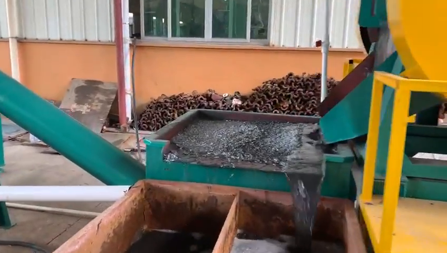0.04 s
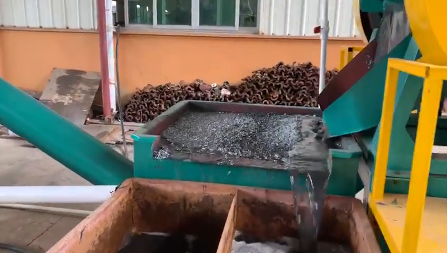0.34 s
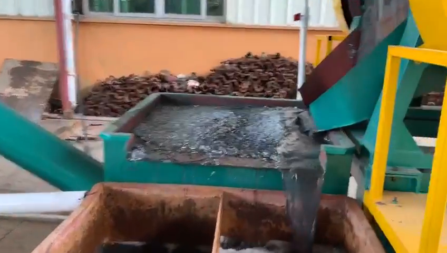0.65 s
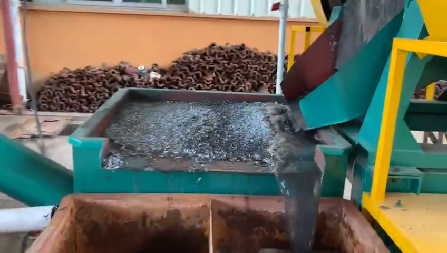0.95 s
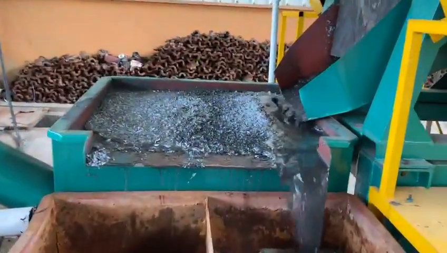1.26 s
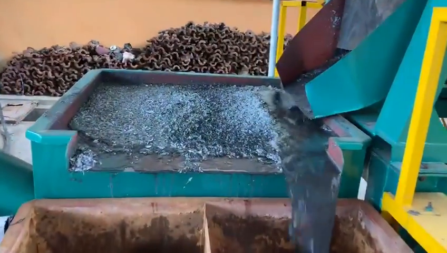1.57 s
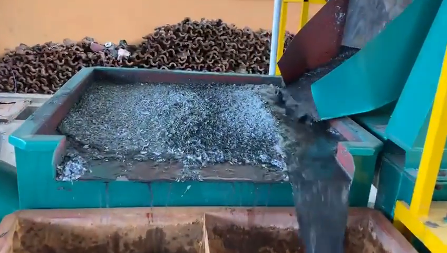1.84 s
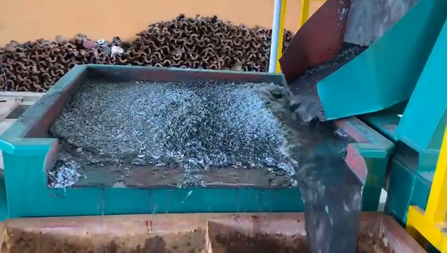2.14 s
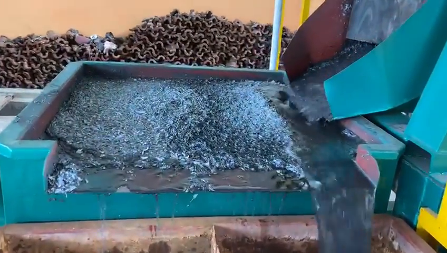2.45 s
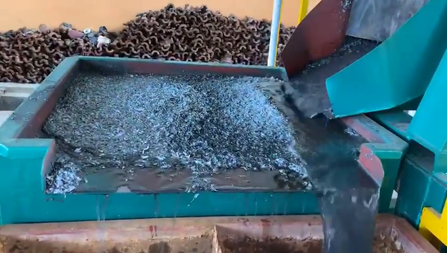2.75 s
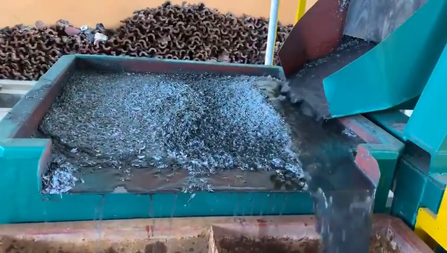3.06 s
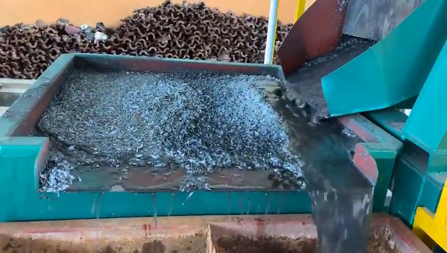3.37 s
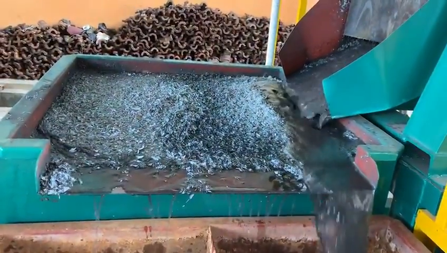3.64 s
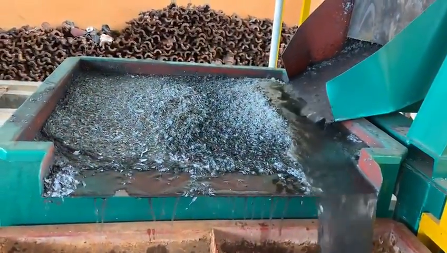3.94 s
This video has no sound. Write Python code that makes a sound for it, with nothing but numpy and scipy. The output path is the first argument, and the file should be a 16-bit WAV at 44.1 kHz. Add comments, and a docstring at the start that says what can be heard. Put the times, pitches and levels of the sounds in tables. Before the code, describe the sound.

Loud, continuous separator machinery fills a plant hall: humming motors, gravel rattling on steel and splashing slurry. A turning drum's load tumbles and thuds about once a second, and a whine strengthens past halfway as the microphone moves slowly closer.

```python
"""Wet separating line in a factory hall

A big drum turns about once a second, and its load tumbles in a swelling rumble with heavy thuds.
Two drives hum and a gear whines. Scraps and gravel strike a vibrating steel screen and excite its
modes, while slurry pours into a tank as drops, spray and ringing bubbles. Far machinery fills the
hall with a diffuse rumble. The microphones move slowly towards the screen."""
import sys
import numpy as np
from scipy import signal
from scipy.fft import rfft, irfft
from scipy.io import wavfile

SR = 44100
rng = np.random.default_rng(int(sys.argv[2]) if len(sys.argv) > 2 else 0)


def store_pcm(level_fs):
    """Save levels as 16-bit WAV."""
    pcm = np.round(np.clip(level_fs, -1, 1) * 32767).astype(np.int16)
    wavfile.write(sys.argv[1], SR, np.atleast_2d(pcm).T)


N = 176400

# slides of the drum's load, one or two a turn: (t/s, level/dB, rise/s, fall/s, hollow ring f/Hz)
TUMBLES = [(.31, -1, 0.38, 0.28, 316), (1.28, -2.5, 0.18, 0.042, 300), (1.40, -1, 0.098, 0.19, 726),
           (2.39, 0, 0.19, 0.27, 376), (3.11, -4, 0.057, .045, 514), (3.32, -1, 0.086, 0.16, 427),
           (3.49, -3.5, 0.073, 0.25, 487)]
SCRAPS_PER_S, SPRAY_DROPS_PER_S = 3000, 11000
STEEL_DIRECT, SPRAY_DIRECT = 0.28, 0.92  # share of the power that arrives directly
SCREEN_LAG_S, SPRAY_LAG_S = 0.000476, 0.000387  # delay at the right microphone


def from_db(db):
    """Amplitude ratio of a level in decibels."""
    return 10 ** (np.asarray(db) / 20)


def unit_rms(x):
    """Normalisation to an rms of 1."""
    return x / np.sqrt(np.mean(x ** 2) + 1e-20)


def seconds():
    """Time t/s of every sample."""
    return np.arange(N) / SR


def bins():
    """Frequency f/Hz of every spectral bin."""
    return np.arange(N // 2 + 1) * SR / N


def in_time(rows):
    """Linear interpolation of (t/s, value) rows."""
    return np.interp(seconds(), *np.transpose(rows))


def response(points):
    """Magnitude response through (f/Hz, level/dB) points on a logarithmic frequency axis."""
    hz, db = np.transpose(points)
    return from_db(np.interp(np.log(bins() + 1), np.log(hz), db))


def colour(x, points):
    """Linear filtering: the spectrum is multiplied by a magnitude response."""
    return irfft(rfft(x) * response(points), N)


def drift(corner_hz):
    """Slow random modulation: low-passed noise with an rms near 1."""
    count, control_hz = 4096, 800
    hz = np.arange(count // 2 + 1) * control_hz / count
    slow = irfft(rfft(rng.standard_normal(count)) / (1 + (hz / corner_hz) ** 2))
    return np.interp(seconds(), np.arange(count) / control_hz, unit_rms(slow))


def pulse(start_s, rise_s):
    """Envelope of a critically damped response: it reaches 1 after rise_s and dies away."""
    age = np.maximum(seconds() - start_s, 0) / rise_s
    return age * np.exp(1 - age)


def clicks(per_s, spread_db):
    """Poisson process: independent impulses of uneven strength and either sign."""
    chance = rng.random(N) * SR / (per_s + 1e-9)
    hits = np.flatnonzero(chance < 1)
    impulses = np.full(N, 1e-18)
    impulses[hits] = from_db(spread_db * np.minimum(-np.log(chance[hits]), 4)) * (-1) ** hits
    return impulses


def resonance(x, hz, width_hz):
    """Forced response of one damped mode, at an rms of 1."""
    r = np.exp(-np.pi * width_hz / SR)
    return unit_rms(signal.lfilter([1, 0, -1], [1, -2 * r * np.cos(2 * np.pi * hz / SR), r * r], x))


def pings(pitches, per_s, spread_db, cycles):
    """Free decay of randomly struck oscillators, each dying away within the given cycles."""
    return sum(resonance(clicks(per_s / len(pitches), spread_db), hz, 2 * hz / cycles) for hz in pitches)


def diffuse(a, b, spacing_m=0.16):
    """Diffuse field from two independent spectra: spaced microphones are coherent only in the bass."""
    coherence = np.sinc(2 * bins() * spacing_m / 343)
    mid, side = a * np.sqrt(1 + coherence), b * np.sqrt(1 - coherence)
    return unit_rms(irfft(np.array([mid + side, mid - side]), N))


def in_hall(x, direct, lag_s, t60_s=0.41):
    """Direct sound, later on the right, plus exponentially decaying reverberation; rms near 1."""
    tails = rng.standard_normal((2, N)) * np.exp(-np.log(1000) * seconds() / t60_s)
    spectrum = rfft(x)
    delayed = irfft(spectrum * np.exp(-2j * np.pi * bins() * lag_s), N)
    reverberation = diffuse(*(rfft(tails) * spectrum))
    return np.sqrt(direct) * unit_rms(np.array([x, delayed])) + np.sqrt(1 - direct) * reverberation


def tone(cycles, db):
    """A sinusoid under slow random amplitude modulation."""
    waver = from_db(1.9 * drift(2.0))
    return from_db(db) * unit_rms(waver * np.sin(2 * np.pi * (cycles + rng.random())))


def hum(shaft_hz, orders, load, wander):
    """Harmonics of a slightly unsteady shaft speed, each rising or falling with the load."""
    turns = np.cumsum(shaft_hz * (1 + wander * drift(1.42))) / SR
    return sum(tone(order * turns, db + load_db * load) for order, db, load_db in orders)


def slides():
    """One envelope for each slide: how much of the load is falling, from 0 to at most 1."""
    t = seconds()
    return [from_db(db) / (1 + ((t - peak_s) / np.where(t < peak_s, rise_s, fall_s)) ** 2 / 2) ** 2
            for peak_s, db, rise_s, fall_s, _ in TUMBLES]


def drum(falling, knocks_per_s=1300):
    """Impact noise: dense dull knocks merge into a rumble, and each slide excites a mode of the shell."""
    # spectrum of the tumbling load: (f/Hz, level/dB)
    spectrum = [(30, -32), (45, -22), (70, -32), (125, 2), (170, -4), (210, -8.5), (255, -5.5), (290, -6.5),
                (345, 0), (420, -3), (460, -9), (740, -4), (860, -12), (1000, -8), (1500, -17.5),
                (2800, -37.5), (6000, -34), (14000, -82)]
    knocks = colour(clicks(knocks_per_s, spread_db=2), spectrum)
    swell = from_db(-12.5) + falling  # some rumble remains between slides
    rumble = from_db(-19) * swell * in_hall(knocks, direct=0.5, lag_s=0.00026)
    strikes = clicks(knocks_per_s, spread_db=3)
    hollow = sum(slide * resonance(strikes, hz, width_hz=21)
                 for slide, (*_, hz) in zip(slides(), TUMBLES))
    return rumble + from_db(-28) * hollow


def drum_drive(falling):
    """Rotational harmonics of the drum's drive, modulated by the falling load."""
    # partials: (shaft order, level/dB, change at full load/dB)
    orders = [(2, -47.5, 5), (4, -33.5, -4), (8, -33, -2.5), (16, -42.5, 8.5)]
    # the drive recedes as the microphones move: (t/s, level/dB)
    nearness = [(0, 5), (.7, 3), (1.4, 3), (2.4, -0.5), (4, -2.5)]
    return from_db(in_time(nearness)) * hum(23.88, orders, falling, wander=0.0029)


def screen(falling, shaker_hz=51.85):
    """Forced vibration: the humming shaker throws scraps against the steel, exciting its modes."""
    # modes of the steel: (f/Hz, bandwidth/Hz, level/dB)
    modes = [(839, 21, -14), (998, 74, -3), (1226, 43, -3), (1527, 17, 4), (1664, 40, -4), (1747, 51, 3),
             (1835, 83, -3), (1985, 38, -6.5), (2256, 24.5, 0.5), (2287, 77, -2.5), (2457, 55, -2.5),
             (2550, 56, -7.5), (2745, 42, -7), (3696, 46, -11), (4365, 70, -4)]
    # nearness of the rattle: (t/s, level/dB)
    rattle_level = [(0, -1.5), (2, -1), (2.6, -1), (4, -1.5)]
    # partials of the shaker: (shaft order, level/dB, change at full load/dB)
    orders = [(3, -33, 4), (4, -38.5, 13.5), (5, -48.5, 9), (6, -35.5, 6), (11, -42, -3.5), (20, -48, 9.5)]
    # the hum grows as the microphones approach: (t/s, level/dB)
    hum_level = [(0, -2), (1.4, -0.5), (2.5, 0), (4, 0)]
    strokes = 1 + 0.6 * np.sin(2 * np.pi * shaker_hz * seconds())
    hits = clicks(SCRAPS_PER_S * strokes, spread_db=2.5)
    ringing = 0
    for k, (hz, width_hz, db) in enumerate(modes):
        clumps = from_db(2 * drift(6.9))  # scraps arrive in clumps, different for each mode
        ringing += (-1) ** k * from_db(db) * resonance(hits * clumps, hz, width_hz)
    rattle = from_db(-26 + in_time(rattle_level)) * in_hall(ringing, STEEL_DIRECT, SCREEN_LAG_S)
    load = np.interp(seconds() - 0.09, seconds(), falling)  # it reaches the screen after it falls
    return rattle + from_db(in_time(hum_level)) * hum(shaker_hz, orders, load, wander=0.00169)


def gravel():
    """Damped ringing after impact: coarse bits hop on the screen, ticking at various pitches."""
    ticks = pings(np.geomspace(1800, 4600, 12), per_s=700, spread_db=4.5, cycles=25)
    return from_db(-35) * in_hall(ticks, direct=0.34, lag_s=SCREEN_LAG_S)


def gear(whine_hz=1627.5):
    """A gear tone that wavers differently at each microphone, with noise-driven modes of its housing."""
    # the whine, louder once the microphones are near: (t/s, level/dB)
    level = [(0, -39), (.9, -36), (1.6, -43), (2.15, -43), (2.3, -32), (3.1, -31.3), (4, -32)]
    # modes of the housing: (f/Hz, bandwidth/Hz, level/dB relative to the whine)
    modes = [(1682, 12, -4.5), (1750, 33, -4.5), (1840, 48, -13.5)]
    phase = 2 * np.pi * np.cumsum(whine_hz + 1.4 * drift(6.8)) / SR
    whine = np.array([unit_rms(from_db(2.2 * drift(2.9)) * np.sin(phase + shift)) for shift in (0.9, 0)])
    housing = sum(from_db(db) * resonance(rng.standard_normal(N), hz, width) for hz, width, db in modes)
    return from_db(in_time(level)) * (whine + in_hall(housing, STEEL_DIRECT, SCREEN_LAG_S))


def flicker(x, depth_db=1.78, rate_hz=31):
    """Independent amplitude modulation of ten overlapping frequency bands."""
    centres = np.geomspace(600, 13000, 10)
    spectrum = rfft(x)
    bands = (irfft(spectrum * np.interp(bins(), centres, pick), N) for pick in np.eye(len(centres)))
    return sum(band * from_db(depth_db * drift(rate_hz)) for band in bands)


def slurry(falling):
    """Shot noise of drops that surge with the drum and of fine spray; bubble resonance in the tank."""
    # spectrum of the splash: (f/Hz, level/dB)
    splash_spectrum = [(300, -11.5), (800, 0), (1300, 2), (2100, -4.5), (2900, -3), (3400, -6.5),
                       (3900, -4.5), (4400, -11), (5000, -12), (6200, -12.5), (8200, -20.5), (14000, -30)]
    # spectrum of the spray off the screen: (f/Hz, level/dB)
    spray_spectrum = [(1500, -14), (4000, 0), (6500, -1), (8500, -2), (10300, 0), (14000, -3)]
    drops = colour(clicks(per_s=12000, spread_db=3), splash_spectrum)
    splash = flicker(in_hall(drops, direct=0.19, lag_s=SCREEN_LAG_S))
    droplets = colour(clicks(SPRAY_DROPS_PER_S, spread_db=5.5), spray_spectrum)
    spray = in_hall(droplets, SPRAY_DIRECT, SPRAY_LAG_S)
    bubbles = pings(np.geomspace(500, 3200, 18), per_s=350, spread_db=8, cycles=6.4)
    return (from_db(-25.5 + 1.5 * falling) * splash
            + from_db(-38 + 0.8 * drift(25)) * spray
            + from_db(-40) * in_hall(bubbles, direct=0.15, lag_s=SCREEN_LAG_S))


def plant():
    """The diffuse field of far machinery, with the tones of other motors and pumps and a mains hum."""
    # spectrum of the steady rumble: (f/Hz, level/dB)
    spectrum = [(20, -44), (35, -42), (47, -13), (60, -4.5), (95, 0.5), (170, 0.5), (240, -2), (400, -5),
                (700, -6.5), (1200, -17.5), (3000, -53)]
    # motor and pump tones, and mains hum near 100 Hz: (f/Hz, level/dB)
    steady_tones = [(73.3, -37), (99.6, -38), (196.5, -44), (363.4, -54), (491.5, -43), (781.5, -43), (818, -44),
                    (987.8, -38.5)]
    noise = rfft(rng.standard_normal((2, N))) * response(spectrum)
    tones = sum(tone(np.cumsum(hz + 0.53 * drift(2.34)) / SR, db) for hz, db in steady_tones)
    return from_db(-27) * diffuse(*noise) + tones


def thuds():
    """Soft impacts: each heavy lump sets one low mode of the drum booming for a moment."""
    # landings: (t/s, level/dB, f/Hz)
    lumps = [(0.401, -27, 98), (0.531, -24, 204), (1.402, -25, 227), (2.201, -22, 126), (2.411, -20.5, 107),
             (3.29, -22.5, 129)]
    booms = 0
    for start_s, db, hz in lumps:
        mode = np.sqrt(2) * np.sin(2 * np.pi * (hz * (seconds() - start_s) + rng.random()))
        booms += from_db(db) * pulse(start_s, rise_s=0.024) * mode
    return booms


def clangs():
    """Repeated impacts: a larger scrap skitters on the steel and briefly excites one mode."""
    # arrivals of larger scraps: (t/s, level/dB)
    scraps = [(0.723, -31), (1.24, -30), (1.41, -25.5), (1.62, -36), (1.96, -31), (2.51, -28), (3.41, -26),
              (3.58, -31)]
    envelope = sum(from_db(db) * pulse(start_s, rise_s=0.012) for start_s, db in scraps)
    ring = resonance(clicks(SCRAPS_PER_S, spread_db=2), hz=2366, width_hz=55)
    return envelope * in_hall(ring, STEEL_DIRECT, SCREEN_LAG_S)


def gush(peak_s=1.405, width_s=0.035):
    """A burst of shot noise: one surge of slurry slaps down with a bright splash."""
    # spectrum of the gush: (f/Hz, level/dB)
    spectrum = [(1200, -12), (3300, 0), (4500, -2), (7000, -11), (14000, -15)]
    envelope = from_db(-28) * np.exp(-((seconds() - peak_s) / width_s) ** 2)
    drops = colour(clicks(SPRAY_DROPS_PER_S, spread_db=4), spectrum)
    return envelope * in_hall(drops, SPRAY_DIRECT, SPRAY_LAG_S)


def scene():
    """Superposition of all sources, with the bass stronger on the right."""
    # balance, left minus right: (f/Hz, level/dB)
    balance = [(60, -2), (200, -3.5), (400, -1), (800, 1), (2400, -1), (5000, -1), (14000, -1)]
    falling = sum(slides())
    mix = drum(falling) + drum_drive(falling) + screen(falling) + gravel() + gear()
    mix += slurry(falling) + plant() + thuds() + clangs() + gush()
    lean = np.sqrt(response(balance))
    return irfft(rfft(mix) * np.array([lean, 1 / lean]), N)


def record(dry):
    """Band limiting: an elliptic low-pass cuts steeply above 14.3 kHz."""
    return signal.sosfilt(signal.ellip(10, 0.2, 90, 14300, fs=SR, output="sos"), dry)


dry = scene()
out = record(dry)
store_pcm(out)
```